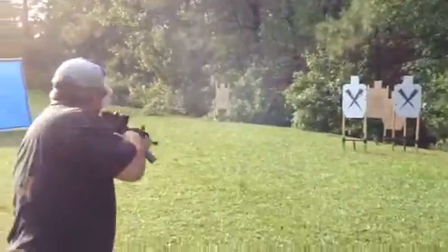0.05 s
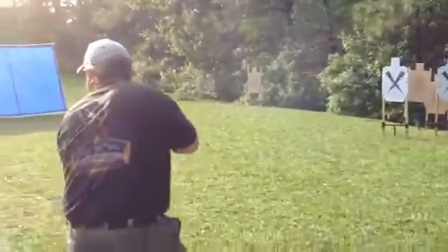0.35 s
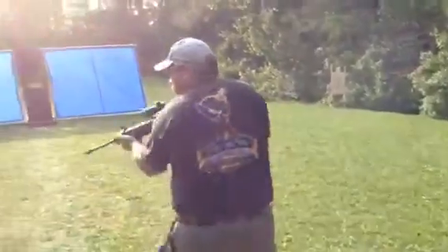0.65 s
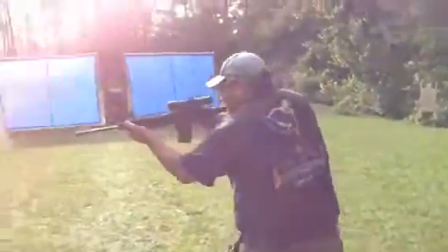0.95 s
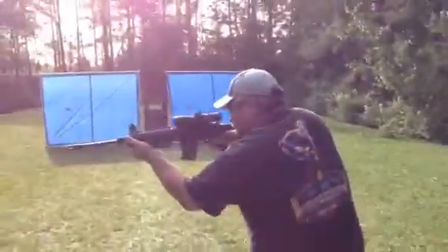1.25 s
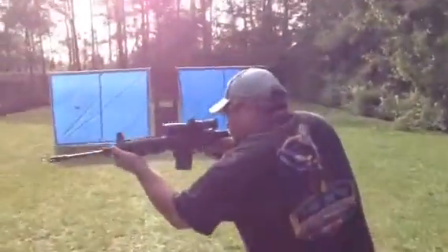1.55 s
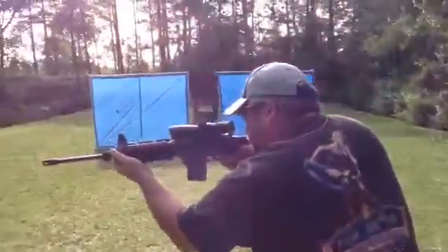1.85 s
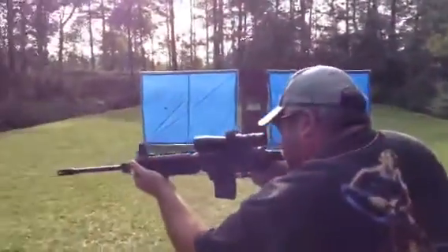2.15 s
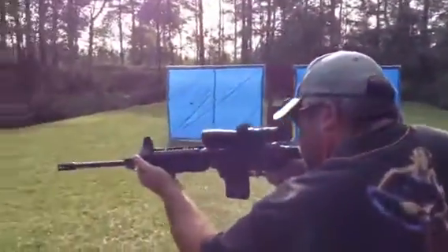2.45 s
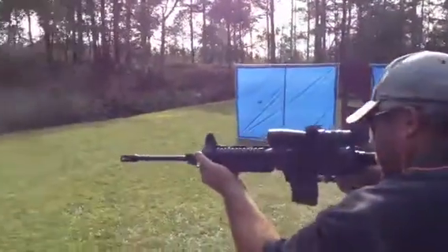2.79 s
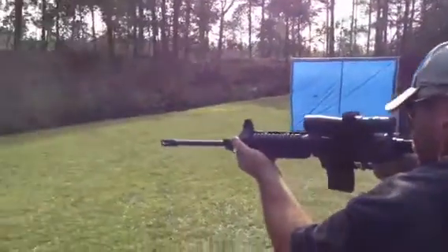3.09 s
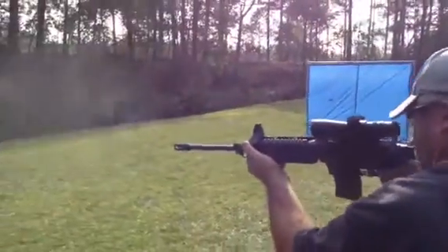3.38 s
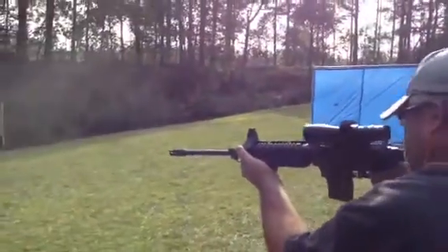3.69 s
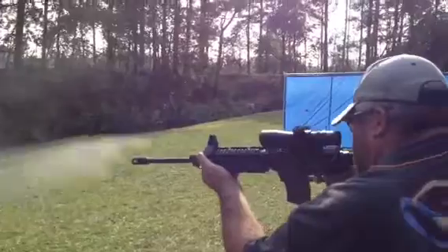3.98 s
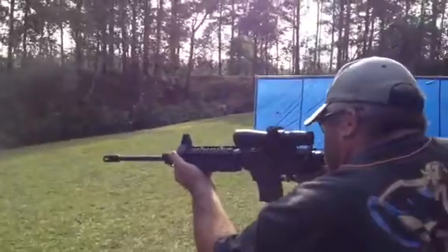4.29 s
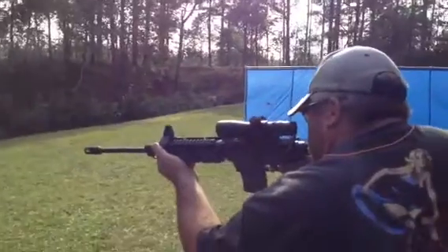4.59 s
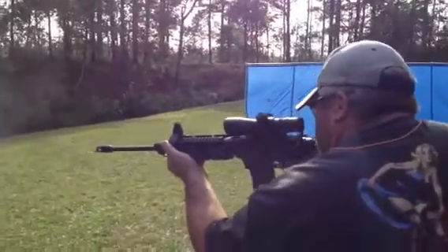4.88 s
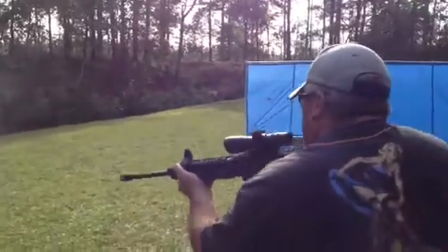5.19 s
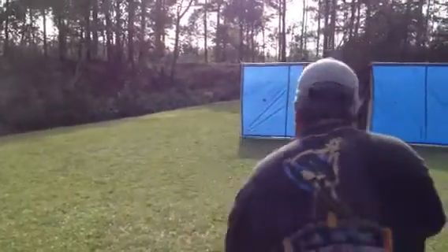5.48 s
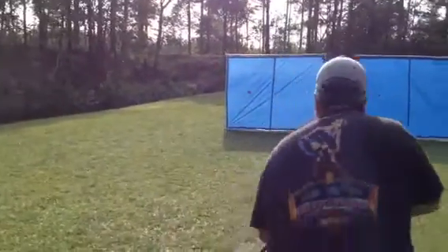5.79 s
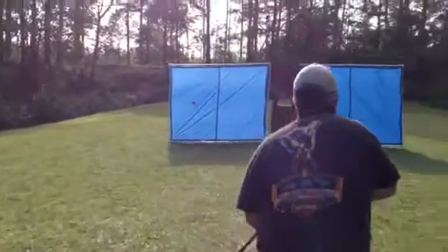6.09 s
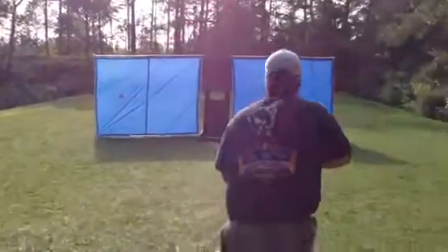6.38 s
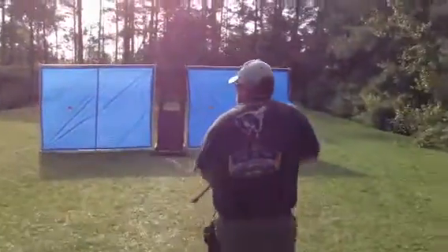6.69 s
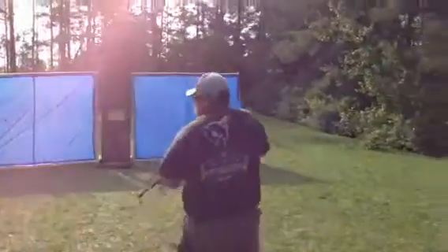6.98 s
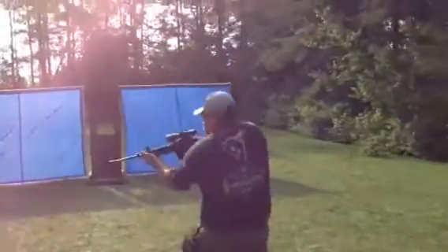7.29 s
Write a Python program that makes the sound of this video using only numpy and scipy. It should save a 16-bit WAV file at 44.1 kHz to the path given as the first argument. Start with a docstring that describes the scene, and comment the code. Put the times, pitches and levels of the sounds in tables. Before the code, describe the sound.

A rifle fires five sharp, echoing shots outdoors, followed by faint footsteps in grass and a dull distant gunshot.

```python
"""A self-loading rifle fires five times a few metres away, on a grass range ringed by earth banks and pines.
Each shot: hammer click, overloading blast, bolt slam, slaps off screens and banks, long wash from the trees.
An earlier shot is still dying at the start; a far gun answers near the end.
The shooter walks through the grass with rattling gear; a thin buzz, likely an insect, comes and goes."""
import sys
import numpy as np
from scipy import signal
from scipy.io import wavfile

SR = 44100
rng = np.random.default_rng(int(sys.argv[2]) if len(sys.argv) > 2 else 0)


def int16_out(signal):
    """Quantize to a 16-bit WAV file."""
    q = np.round(np.clip(np.atleast_2d(signal).T, -1, 1) * 32767)
    wavfile.write(sys.argv[1], SR, q.astype(np.int16))


N = 328545
TIME_S = np.arange(N) / SR

# Near shots. Each row: start in seconds, blast trim in dB, echo trim in dB.
NEAR_SHOTS = [(1.9752, -1.5, -.5), (2.6100, -1, -0.5), (3.3667, -2, 0), (4.0657, -1.5, 0), (4.8187, -1, 0)]
# Slaps off screens, banks and forest edge, for the earlier shot's spot and for the near rifle.
# Each row: delay in seconds, pitch in Hz, thump level within the slap in dB.
EARLIER_REFLECTIONS = [(.1475, 800, -9), (.1690, 840, -10), (.1725, 705, -18), (.2240, 710, -16),
                       (.2770, 725, -13)]
NEAR_REFLECTIONS = [(.0568, 1250, -7), (.0682, 950, -12), (.0708, 620, -6), (.0858, 470, -14),
                    (.0942, 580, -14), (.1068, 650, -15), (.121, 700, -16), (.151, 720, -14),
                    (.215, 720, -12), (.276, 600, -5), (.303, 450, -4), (.402, 720, -16)]
# Noise spectra. Each row: frequency in Hz, relative density in dB.
BLAST_SPECTRUM = [(18, -55), (30, -24.5), (129, -9.5), (346, 5.5), (472, -1.5), (698, 1), (837, -6),
                  (978, -5.5), (1200, -2), (1600, -6), (6200, -6.5), (12800, -5), (15000, -5)]
WASH_SPECTRUM = [(29, -76.5), (50, -51.5), (91, -34), (209, 0), (253, -13), (354, -7.5), (544, -12),
                 (613, 4.5), (724, -6), (1060, -14), (1380, -10), (1840, -13), (4550, -13), (11800, -14.5),
                 (15000, -19)]
RUMBLE_SPECTRUM = [(47, -81), (80, -50), (199, -5.5), (237, -17.5), (295, -7.5), (359, -9.5), (513, -4),
                   (650, -1), (746, -1), (927, -8), (4600, -20), (5490, -33.5), (7680, -25.5), (9000, -47),
                   (11700, -83), (19800, -120)]
FAR_BLAST_SPECTRUM = [(29, -33), (50, -36), (137, -3.5), (667, -2), (1080, -8), (1750, -6), (2010, -8),
                      (3250, -10), (8910, -34), (12000, -35), (15600, -59), (22000, -120)]
FAR_WASH_SPECTRUM = [(53, -61), (90, -37), (116, -29), (202, -8), (351, -13), (436, -0.5), (510, 1),
                     (699, 3.5), (1240, -14), (1480, -9), (2720, -10.5), (10000, -35), (13000, -69),
                     (22000, -120)]
RUSTLE_SPECTRUM = [(1500, -9), (3500, -5), (6000, -8), (9500, -7), (12500, -1.5), (15000, -5.5)]
AIR_SPECTRUM = [(18, -57), (30, -32), (113, -21.5), (195, -6.5), (426, -2), (581, 0.5), (754, -3.5),
                (928, -24), (1170, -7), (1690, -17.5), (3500, -28.5), (4900, -25), (9150, -31),
                (15000, -27.5)]
# Echo decay; air absorbs the treble. Each row: frequency in Hz, T60 in seconds.
WASH_DECAY = [(60, 0.46), (200, 1.096), (700, 1.1), (1500, 1.1), (3200, 0.98), (6500, 0.79), (10000, 0.63),
              (15000, 0.54)]
RUMBLE_DECAY = [(150, 3), (650, 5.33), (1500, 4.67), (3200, 3.75), (8000, 2.8)]
# Grass and cloth swishes; buzz bouts. Each row: start in seconds, length in seconds, level in dB.
SWISH_BOUTS = [(.715, .05, -64), (.79, .025, -66), (.945, 0.19, -66.5), (1.08, 0.21, -61.5),
               (1.34, .05, -64), (1.783, .025, -66), (1.845, 0.042, -61), (5.76, 0.22, -63),
               (5.89, 0.39, -57.5), (6.185, .2, -55.5), (6.33, 0.26, -62.5), (6.55, 0.98, -69),
               (6.68, 0.089, -63), (6.765, .065, -55.5), (6.89, .31, -61), (7.325, 0.053, -58)]
BUZZ_BOUTS = [(1.0, 0.75, -77), (5.86, .2, -68), (6.12, .4, -63), (6.69, .17, -68), (6.9, 0.33, -67)]
# Gear contacts. Each row: start in seconds, relative level in dB, pitch in Hz.
GEAR_TICKS = [(1.008, -53, 8000), (1.102, -48, 3900), (1.6125, -59, 5200), (1.8585, -56, 9000),
              (6.088, -45, 12000), (6.5985, -59, 8000), (6.774, -56, 9000), (7.0295, -42, 11000),
              (7.192, -48, 7000), (7.3335, -57, 6000), (7.410, -48, 8900)]


def from_db(db):
    """Decibels to gain."""
    return 10 ** (np.asarray(db) / 20)


def unit_rms(x):
    """Scale to rms 1."""
    return x / np.sqrt(np.mean(x ** 2) + 1e-20)


def at_hz(table, hz):
    """Read a table on a log-frequency axis."""
    table_hz, values = np.transpose(table)
    return np.interp(np.log(hz), np.log(table_hz), values)


def butter(x, order, edges_hz, kind="band"):
    """Butterworth filter."""
    return signal.sosfilt(signal.butter(order, edges_hz, kind, fs=SR, output="sos"), x)


def add(out, sound, start_s):
    """Mix a sound in; start_s may be negative."""
    start = round(start_s * SR)
    part = sound[max(-start, 0):len(out) - start]
    out[max(start, 0):max(start, 0) + len(part)] += part


def noise(spectrum, size, decay=None):
    """Third-octave noise starting near rms 1; a decay table gives each band its own T60."""
    edges_hz = np.geomspace(25, 16000, 29)
    centres_hz = np.sqrt(edges_hz[1:] * edges_hz[:-1])
    gains = from_db(at_hz(spectrum, centres_hz))
    gains /= np.sqrt(np.sum(gains ** 2 * np.diff(edges_hz)) / (SR / 2))
    run_in = SR // 10
    white = rng.standard_normal((2, size + run_in))
    out = np.zeros(size)
    for k, hz in enumerate(centres_hz):
        band = butter(white[k % 2], 2, edges_hz[k:k + 2])[run_in:]
        fade = from_db(-60 * TIME_S[:size] / at_hz(decay, hz)) if decay else 1
        out += gains[k] * band * fade
    return out


def burst(hz, octaves, t60_s):
    """A contact: a sudden, fast-dying noise band."""
    t = TIME_S[:SR // 10]
    half_width = 2 ** (octaves / 2)
    edges_hz = np.clip([hz / half_width, hz * half_width], 20, [.4 * SR, .45 * SR])
    band = butter(rng.standard_normal(len(t)), 2, edges_hz)
    return unit_rms(band) * from_db(-60 * t / t60_s)


def swing(hz, rise_cycles):
    """A pressure swing of a few cycles, height about 1."""
    cycles = TIME_S[:SR // 10] * hz
    return np.sin(2 * np.pi * cycles) * cycles / rise_cycles * np.exp(1 - cycles / rise_cycles)


def swell(size, onset_s, rise_s):
    """Echo onset as the blast reaches the trees."""
    return (1 + np.tanh((TIME_S[:size] - onset_s) / rise_s)) / 2


def flutter(size, depth_db, lump_samples):
    """Lumpy random gain, rms 1."""
    white = rng.standard_normal(size + 2 * lump_samples)
    lumps = signal.fftconvolve(white, np.hanning(2 * lump_samples + 1), "valid")
    return unit_rms(from_db(depth_db * unit_rms(lumps)))


def bouts(rows, attack_share=.22, release_share=.37):
    """Gain that swells, holds and fades per row; overlaps add in power."""
    power = np.zeros(N)
    for start_s, length_s, db in rows:
        progress = (TIME_S - start_s) / length_s
        ramp = np.minimum(progress / attack_share, (1 - progress) / release_share)
        power += (from_db(db) * np.clip(ramp, 0, 1)) ** 2
    return np.sqrt(power)


def slaps(rows, near_delay_s=.06):
    """Reflected blasts: a dull swing roughened by the surface, a low thump, bright splinters."""
    out = np.zeros(SR)
    for delay_s, hz, thump_db in rows:
        doublings = np.log2(delay_s / near_delay_s)   # longer path: weaker, duller
        wobble = rng.standard_normal(3)   # the shooter shifts between shots
        pitch_hz = hz * from_db(.6 * wobble[0])
        body = .75 * swing(pitch_hz, rise_cycles=.7) + .42 * burst(pitch_hz, octaves=1.6, t60_s=.028)
        thump = from_db(thump_db) * swing(290 * from_db(1.8 * wobble[1]), rise_cycles=.38)
        splinters = from_db(-9.5 - 4 * doublings) * burst(3000, octaves=2.4, t60_s=.022)
        slap = from_db(-2.5 - 8 * doublings) * (body + thump + splinters)
        add(out, slap, delay_s + .0003 * wobble[2])
    return butter(out, 4, 115, "high")


def tree_echoes(size, ring_hz=735, width_hz=170, ring_t60_s=.97):
    """Near trees answer broadly, the forest behind with a hollow ring."""
    hollow = butter(rng.standard_normal(size), 2, [ring_hz - width_hz / 2, ring_hz + width_hz / 2])
    ring = unit_rms(hollow) * from_db(-5 - 60 * TIME_S[:size] / ring_t60_s)
    return noise(WASH_SPECTRUM, size, WASH_DECAY) + ring * swell(size, onset_s=.091, rise_s=.017)


def forest_rumble(rise_s=.24):
    """The deep forest returns a shot for seconds."""
    t = TIME_S[:4 * SR]
    return noise(RUMBLE_SPECTRUM, len(t), RUMBLE_DECAY) * np.minimum(t / rise_s, 1)


def far_wash(onset_s, rise_s):
    """Countless small echoes off far trunks and leaves."""
    size = 5 * SR // 4
    return noise(FAR_WASH_SPECTRUM, size, WASH_DECAY) * swell(size, onset_s, rise_s)


def earlier_shot(rumble, start_s=-.11, band_hz=(150, 7000)):
    """Dying echoes of a shot from another spot, duller and thinner."""
    out = np.zeros(N)
    add(out, from_db(-1) * slaps(EARLIER_REFLECTIONS), start_s)
    add(out, from_db(-19) * butter(tree_echoes(5 * SR // 4), 1, band_hz), start_s)
    add(out, from_db(-29) * far_wash(onset_s=.053, rise_s=.036), start_s + .17)   # farther tree line
    add(out, from_db(-38.5) * rumble, start_s)
    return out


def outdoor_air(level_db=-57):
    """Faint steady noise of the open air."""
    return from_db(level_db) * noise(AIR_SPECTRUM, N)


def swishes():
    """Shoes brush grass and cloth moves, in fine grains."""
    return bouts(SWISH_BOUTS) * flutter(N, depth_db=1.5, lump_samples=110) * noise(RUSTLE_SPECTRUM, N)


def buzz(hz=4680, width_hz=420):
    """Bouts of narrow high noise, insect-like."""
    band = butter(rng.standard_normal(N), 2, [hz - width_hz / 2, hz + width_hz / 2])
    return bouts(BUZZ_BOUTS) * unit_rms(band) * flutter(N, depth_db=1.2, lump_samples=250)


def gear_rattle(ping_hz=4700, ping_db=-55, ping_t60_s=.026):
    """Sling and magazines tick; a small metal part rings once."""
    out = np.zeros(N)
    for start_s, db, hz in GEAR_TICKS:
        add(out, from_db(db - 6) * burst(hz, octaves=1.4, t60_s=.025), start_s)
    t = TIME_S[:SR // 4]
    ping = from_db(ping_db - 60 * t / ping_t60_s) * np.sin(2 * np.pi * ping_hz * t)
    add(out, ping, start_s=1.6125)
    return out


def hammer_click():
    """The hammer falls."""
    return from_db(-23.5) * burst(5700, octaves=4.5, t60_s=.012)


def muzzle_blast(rise_s=.00068, hold_s=.013, t60_s=.17, grass_t60_s=.69):
    """The blast snaps, holds briefly and falls, leaving hiss scattered by the grass."""
    t = TIME_S[:SR // 4]
    fall = from_db(-150 * np.minimum(t, hold_s) - 60 * np.maximum(t - hold_s, 0) / t60_s)
    grass = from_db(-15 - 60 * t / grass_t60_s)
    envelope = np.minimum(t / rise_s, 1) * np.hypot(fall, grass)
    blast = from_db(-9) * noise(BLAST_SPECTRUM, len(t)) * envelope
    add(blast, from_db(-14) * burst(2800, octaves=2, t60_s=.05), 0)   # snap
    return blast


def bolt_slam():
    """The bolt slams home."""
    return from_db(-15) * burst(9800, octaves=2, t60_s=.015)


def near_wash(steady, lumps, split_hz=1300):
    """Long waves return much alike each shot; moving air and leaves scramble the short ones."""
    size = len(steady)
    fresh = tree_echoes(size)
    alike = .77 * steady + .64 * fresh
    roll = butter(alike * lumps * swell(size, onset_s=.067, rise_s=.035), 3, [50, split_hz])
    hiss = butter(fresh * swell(size, onset_s=.055, rise_s=.0054), 3, split_hz, "high")
    return from_db(-11) * roll + from_db(-9.5) * hiss


def rifle(rumble, hammer_lead_s=.0075, bolt_lag_s=.0385):
    """Five near shots, each with its action noise and echoes."""
    out = np.zeros(N)
    steady = tree_echoes(5 * SR // 4)
    lumps = flutter(len(steady), depth_db=2.6, lump_samples=260)
    for start_s, blast_db, echo_db in NEAR_SHOTS:
        wash = near_wash(steady, lumps)
        add(out, hammer_click(), start_s - hammer_lead_s)
        add(out, from_db(blast_db) * muzzle_blast(), start_s)
        add(out, bolt_slam(), start_s + bolt_lag_s)
        add(out, slaps(NEAR_REFLECTIONS), start_s)
        add(out, from_db(echo_db) * wash, start_s)
        add(out, from_db(echo_db - 34) * rumble, start_s)
    return out


def far_gun(rumble, start_s=6.2765, t60_s=.23):
    """A dull pop from another bay, its wash about as loud as the blast."""
    out = np.zeros(N)
    t = TIME_S[:SR // 2]
    blast = from_db(-34 - 60 * t / t60_s) * noise(FAR_BLAST_SPECTRUM, len(t))
    pop = from_db(-28) * swing(580, rise_cycles=.51)
    snap = from_db(-44) * burst(2200, octaves=1.9, t60_s=.016)
    wash = from_db(-31.5) * far_wash(onset_s=.065, rise_s=.053)
    for part in (blast, pop, snap, wash, from_db(-41.5) * rumble):
        add(out, part, start_s)
    return out


def scene():
    """All sources over the outdoor air, mono."""
    rumble = forest_rumble()
    air = outdoor_air()
    gunfire = rifle(rumble) + earlier_shot(rumble) + far_gun(rumble)
    walking = swishes() + gear_rattle()
    return (gunfire + walking + buzz() + air)[None]


def record(dry, ceiling=.68, cutoff_hz=15450):
    """The microphone overloads on the blasts; the top is cut."""
    squashed = dry / (1 + (dry / ceiling) ** 4) ** (1 / 4)
    lowpass = signal.firwin(301, cutoff_hz, window="blackman", fs=SR)
    return signal.fftconvolve(squashed, lowpass[None], "same")


dry = scene()
out = record(dry)
int16_out(out)
```